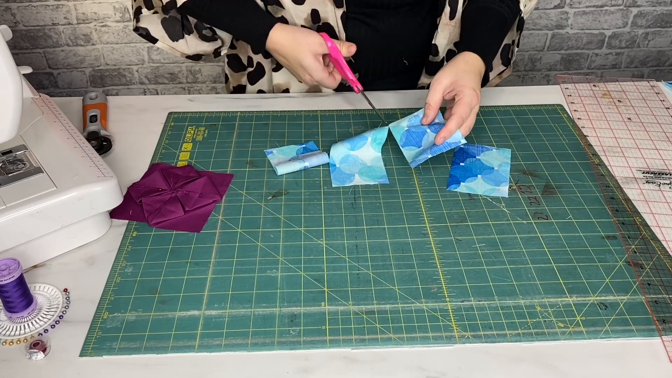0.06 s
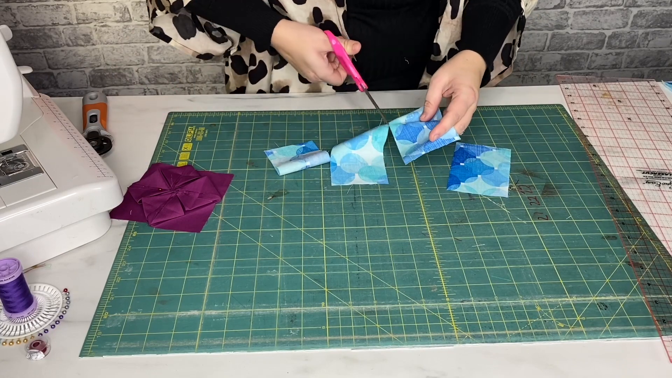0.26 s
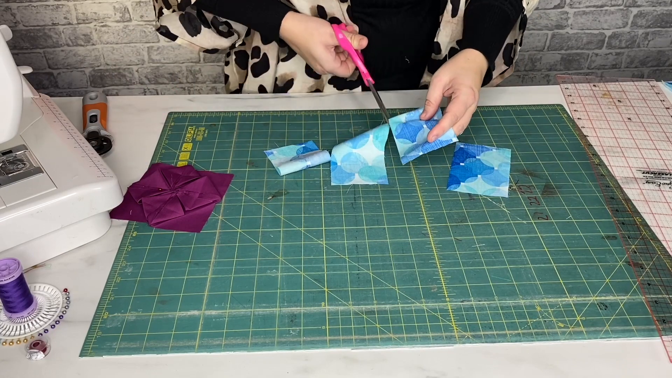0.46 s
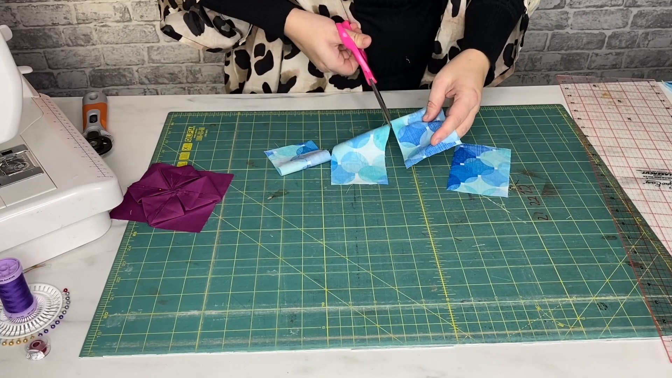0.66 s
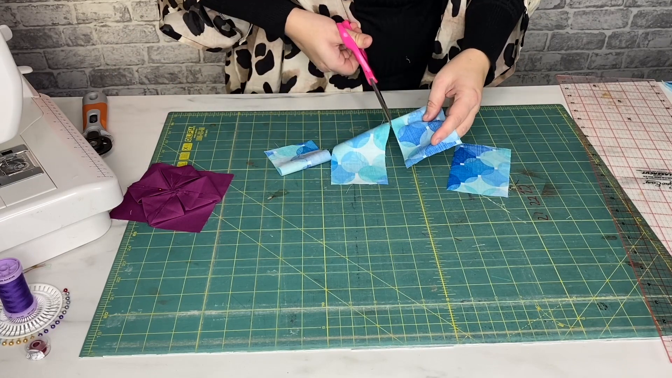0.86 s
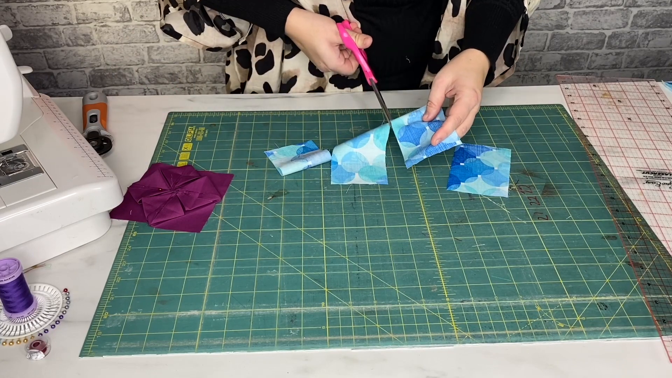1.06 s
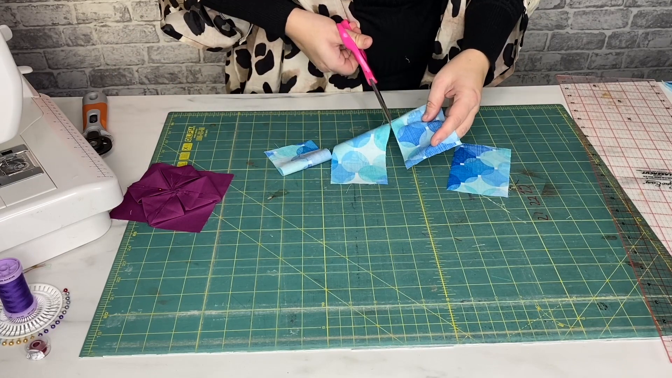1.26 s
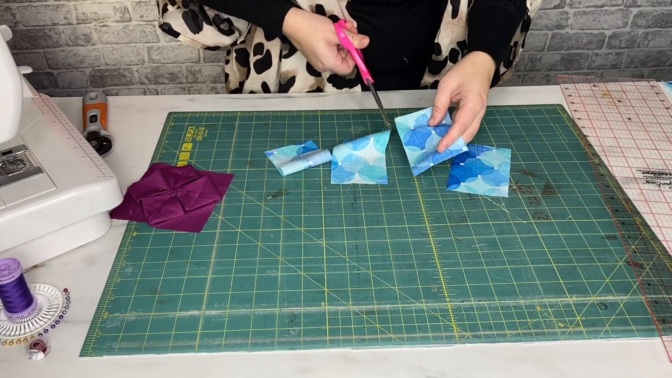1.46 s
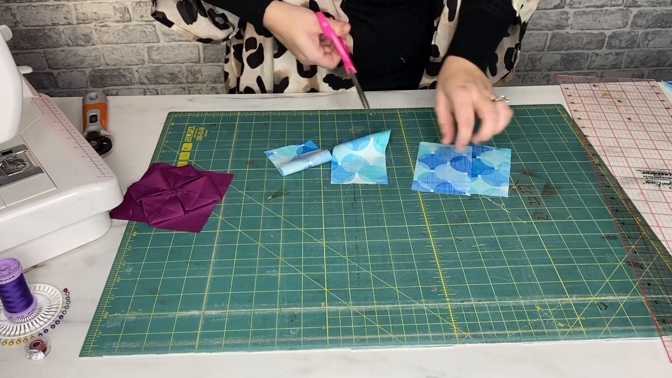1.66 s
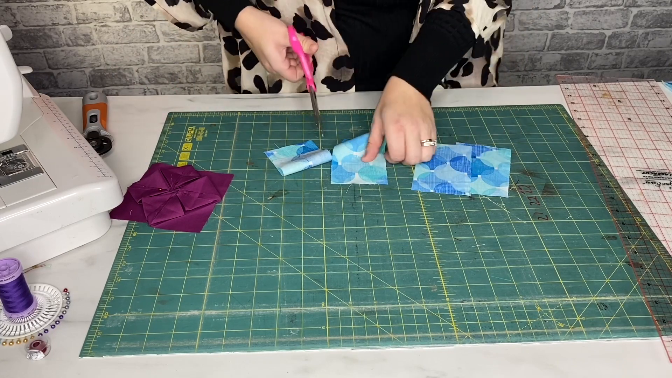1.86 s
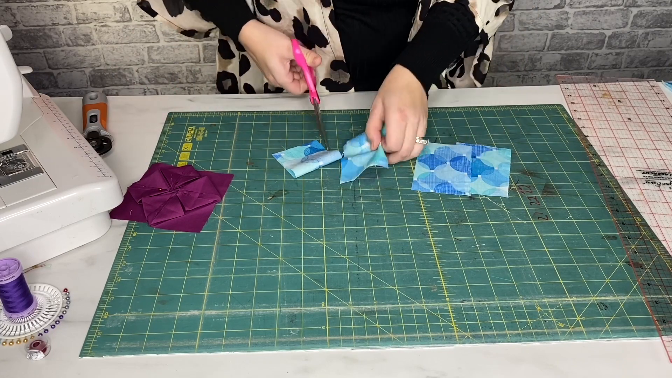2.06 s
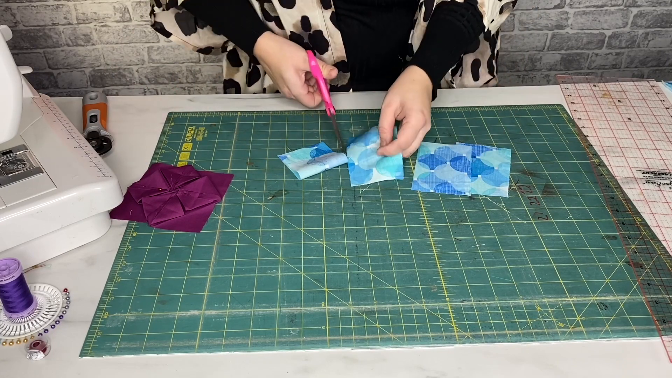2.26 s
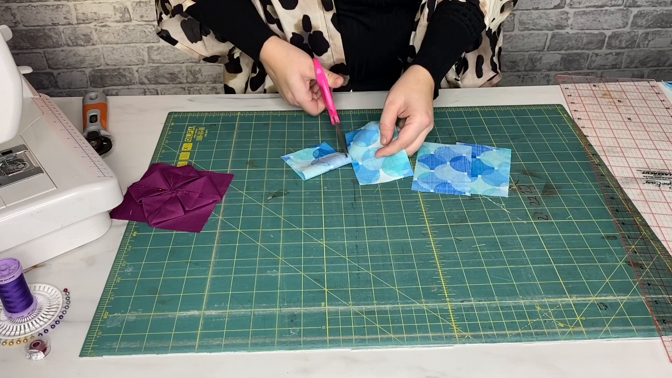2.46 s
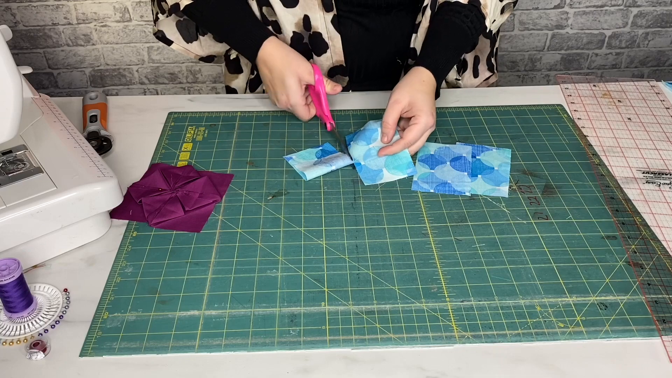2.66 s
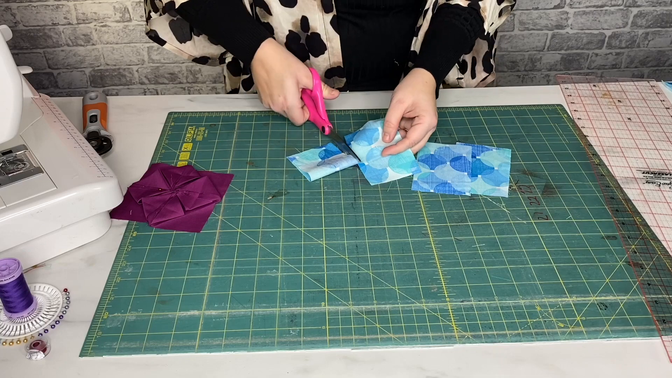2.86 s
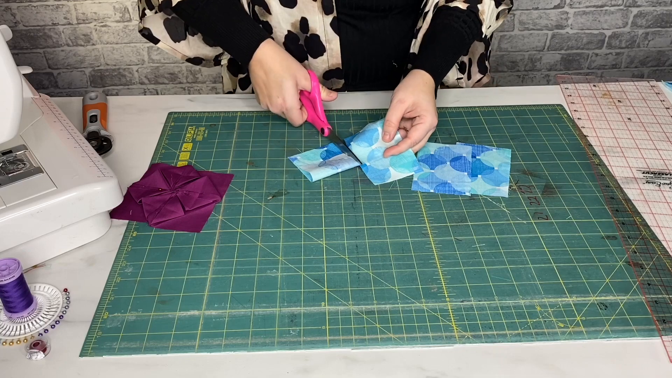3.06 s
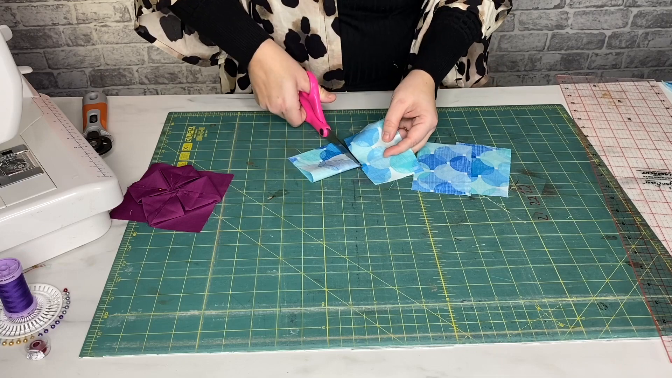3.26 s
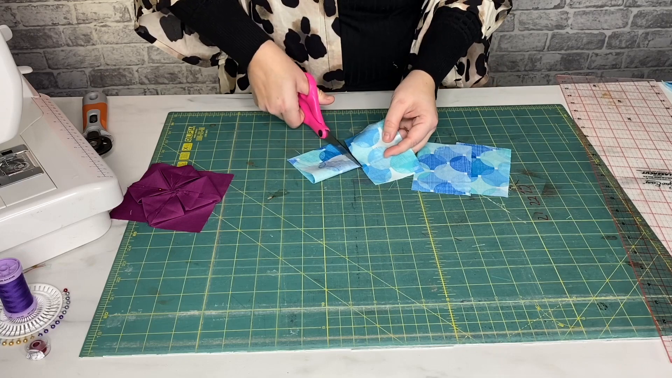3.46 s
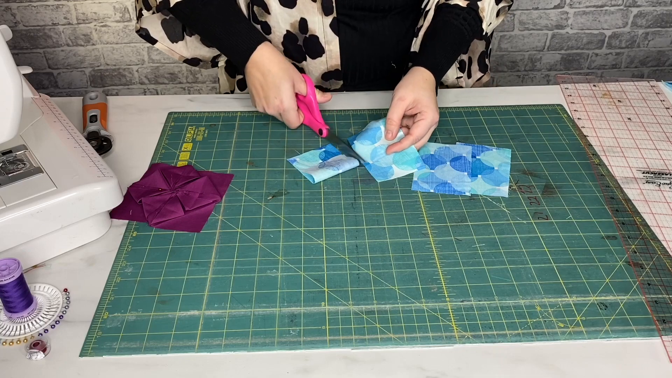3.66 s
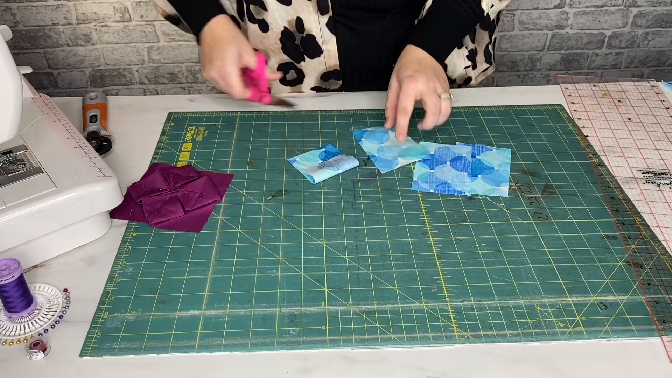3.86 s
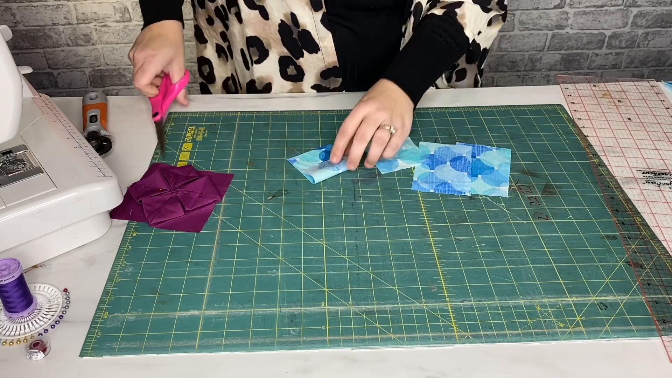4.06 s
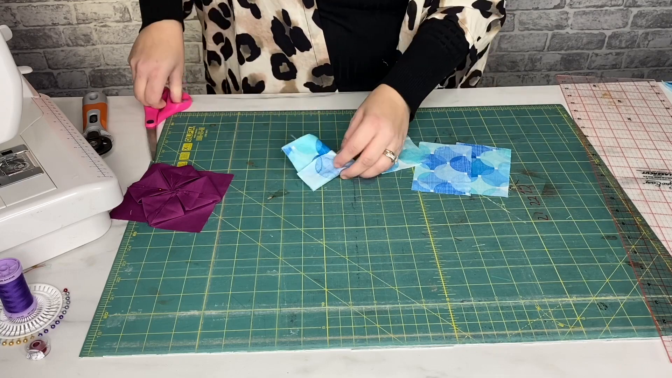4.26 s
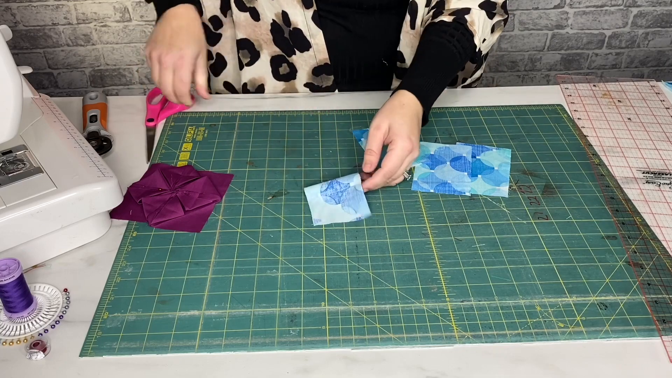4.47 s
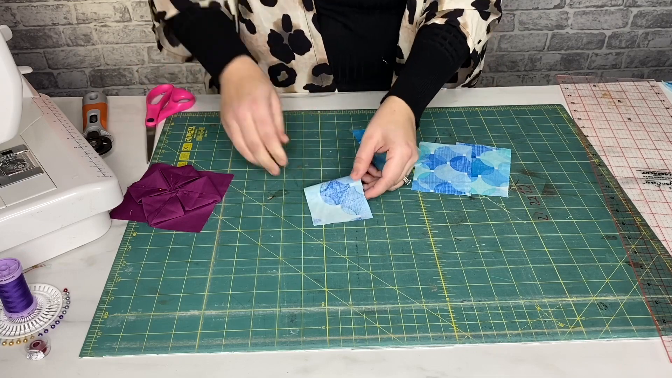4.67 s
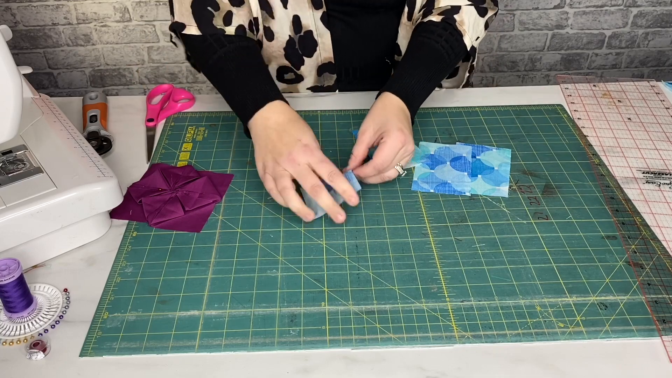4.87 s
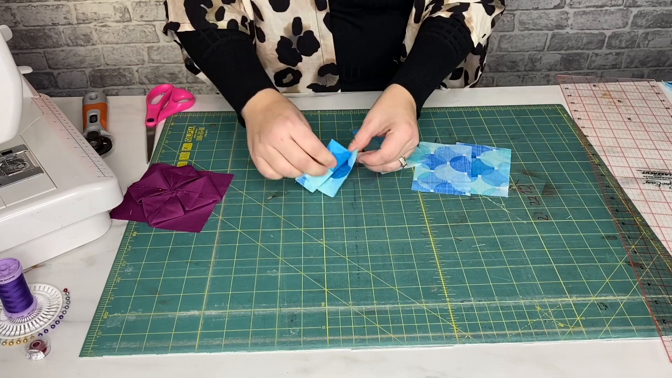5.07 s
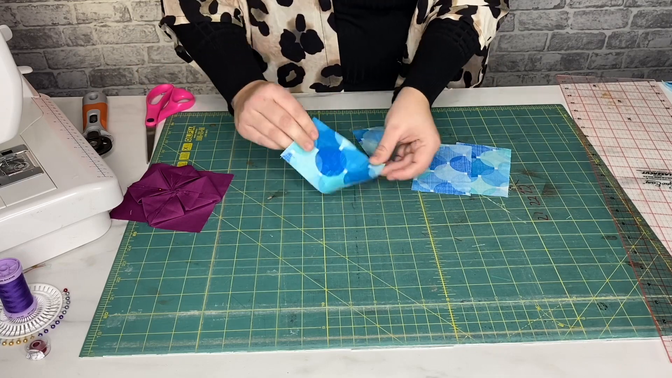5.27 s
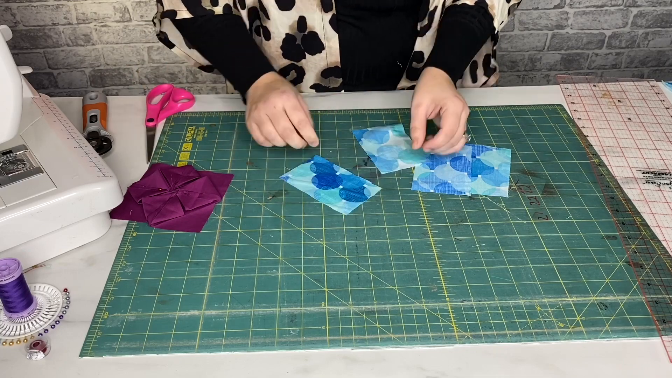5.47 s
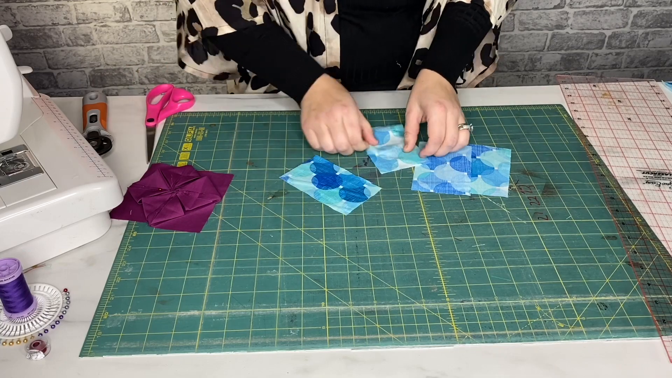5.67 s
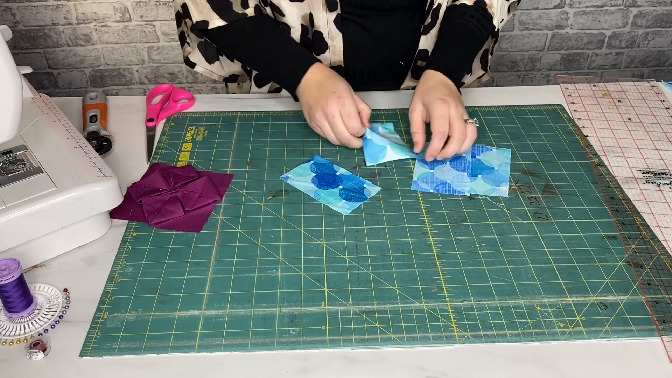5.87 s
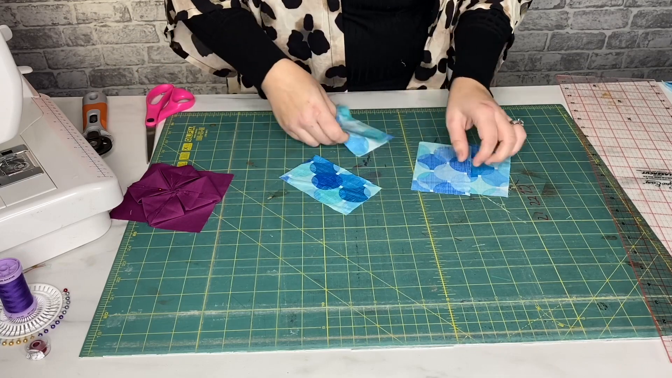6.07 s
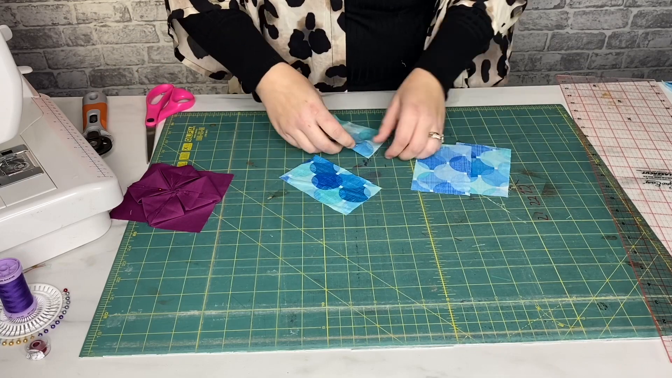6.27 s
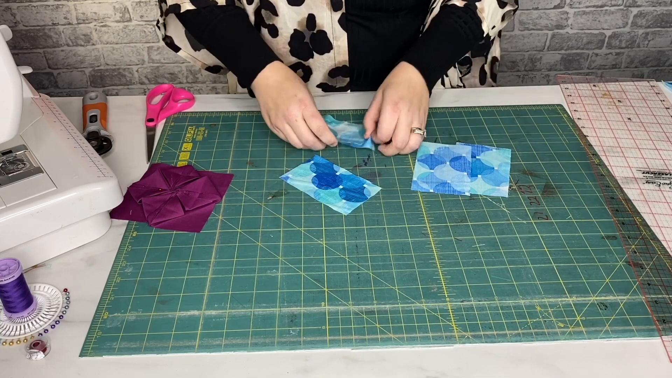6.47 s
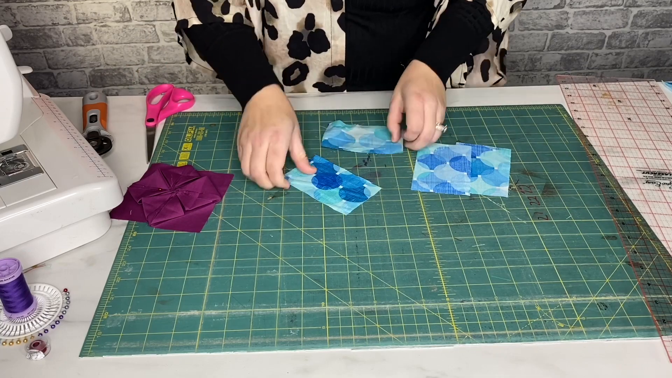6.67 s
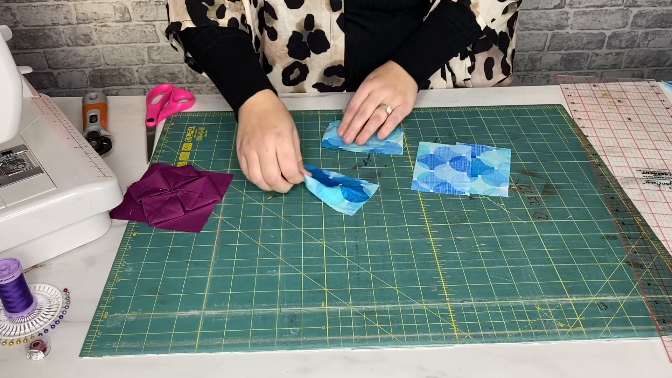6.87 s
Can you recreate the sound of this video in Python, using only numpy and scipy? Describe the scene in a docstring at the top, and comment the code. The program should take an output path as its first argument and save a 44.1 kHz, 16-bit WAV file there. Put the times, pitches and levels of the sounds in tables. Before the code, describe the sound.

Close stereo pickup of a work table indoors: one loud crisp scissor snip, soft cloth hiss and light scrapes, small knocks, then another sharp snip. Soon the steel scissors clatter down on the padded surface and rock to rest. Afterwards only gentle fabric rustles and faint pats remain, over quiet air and a low distant engine hum that swells and sags.

```python
"""A small, quiet room: scissors snip two threads between cotton squares over a cutting mat.
They also tap the table and are dropped on it: steel and wood sound as decaying modes set off by clicks.
Hands slide and rustle the cloth: enveloped noise shakes the table modes and hisses in bands.
Low sines make a far engine's drone and two other hums; banded noise makes the air and the room's echoes.
Two spaced microphones hear the table from its right side."""
import sys
import numpy as np
from scipy import signal
from scipy.io import wavfile

SR = 44100
rng = np.random.default_rng(int(sys.argv[2]) if len(sys.argv) > 2 else 0)


def generate_wav(sig):
    """Save sig (samples, or channels by samples) to the path in sys.argv[1] as 16-bit PCM at SR."""
    pcm = np.round(np.clip(np.atleast_2d(sig).T, -1, 1) * 32767).astype(np.int16)
    wavfile.write(sys.argv[1], SR, pcm)


def boost_factor(decibels):
    """Convert a level in decibels to a linear amplitude factor."""
    exponent = np.asarray(decibels, float) / 20
    return 10 ** exponent


N = 304618

# modes of the table and mat: (f/Hz, relative level/dB, free t60/s)
TABLE_MODES = [(139.8, -9.5, 0.14), (184.2, -7.5, 0.17), (241.8, -1, .1), (336, -5, 0.054),
               (425.5, -0.5, 0.1), (584, -4, 0.058), (606, -3, 0.035), (796, -3, 0.036), (873, -4.5, 0.014),
               (966, -2, 0.018), (1084, -10.5, .03), (1160, -2.5, 0.03), (1330, -8, 0.068),
               (1490, -3.5, 0.028), (1744, -13.5, 0.06), (1906.6, -9, 0.04), (2415, -9.5, 0.053),
               (2930, -9.5, 0.019)]


def rms_one(x):
    """Normalisation: scale to a root-mean-square of 1."""
    return x / np.sqrt(np.mean(x ** 2) + 1e-20)


def in_time(rows):
    """Linear interpolation: each column of a curve, one value per sample."""
    s, *columns = np.transpose(rows)
    return [np.interp(np.arange(N) / SR, s, column) for column in columns]


def at_hz(points, hz):
    """Logarithmic frequency scale: read a (frequency, value) table at hz."""
    table_hz, values = np.array(points).T
    return np.interp(np.log(hz), np.log(table_hz), values)


def drift(rate_hz):
    """Low-passed random fluctuation: noise through two equal poles at rate_hz, scaled to rms 1."""
    hop = 40    # samples between computed values
    r = np.exp(-2 * np.pi * rate_hz * hop / SR)
    noise = rng.standard_normal(N // hop + 2002)
    slow = signal.lfilter([1], [1, -2 * r, r * r], noise)[2000:]   # without the filter's start
    return np.interp(np.arange(N) / hop, np.arange(len(slow)), rms_one(slow))


def ring(clicks, hz, t60):
    """Damped resonance: a unit click starts a decaying sine of height 1."""
    r, w = boost_factor(-60 / (t60 * SR)), 2 * np.pi * hz / SR
    return signal.lfilter([0, np.sin(w)], [1, -2 * r * np.cos(w), r * r], clicks + 1e-18)


def bands(size):
    """Interchannel correlation: half-octave stereo noise, mid and side weighted for a set likeness."""
    # how alike left and right are: (f/Hz, correlation coefficient)
    likeness = [(25, 0.96), (60, 0.92), (250, 0.76), (600, 0.062), (1500, -0.052), (4000, 0.53),
                (12000, -0.44)]
    edges_hz = 22 * 2 ** np.arange(0, 9.7, .5)
    white = rng.standard_normal((2, 2, size))
    for k, (low, high) in enumerate(zip(edges_hz, edges_hz[1:])):
        band = signal.butter(2, [low, high], "band", fs=SR, output="sos")
        mid, side = signal.sosfilt(band, white[k % 2])   # neighbouring bands use separate noise
        hz = np.sqrt(low * high)
        alike = np.clip(at_hz(likeness, hz), -1, 1)
        yield hz, np.sqrt(1 + alike) * mid + np.sqrt(1 - alike) * side * [[1], [-1]]


def place(x, pan_db, lag_ms):
    """Interchannel level and time difference: left is pan_db stronger and lag_ms later than right."""
    left = np.roll(x, round(lag_ms * SR / 1000))
    return np.array([left * boost_factor(pan_db / 2), x * boost_factor(-pan_db / 2)])


def peak_at(x, s, db):
    """Superposition in time: lay a short sound down at s with the given peak."""
    out, at = np.zeros(N + len(x)), round(s * SR)
    out[at:at + len(x)] = boost_factor(db) * x / np.abs(x).max()
    return out[:N]


def rattle(ms, share, size):
    """Repeated impact: one sharp click, then a run of uneven ones dying with time constant ms."""
    decay = np.exp(-np.arange(size) * 1000 / SR / max(ms, .05))
    run = share * rng.standard_normal(size) ** 3 * decay
    run[0] = 1
    return run


def stroke(s, db, rise_s, hold_s, fall_db_per_s):
    """Exponential envelope: a sound swells 20 dB in rise_s, holds, then falls at a steady dB rate."""
    t = np.arange(N) / SR - s
    rise_db = 20 * t / max(rise_s, .001)   # the swell takes at least 1 ms
    fall_db = -fall_db_per_s * (t - hold_s)
    return boost_factor(db + np.minimum(0, np.minimum(rise_db, fall_db)))


def air():
    """Stationary broadband noise: shaped bands make the room's air, each wavering a little."""
    # spectrum of the room noise: (f/Hz, relative level/dB per Hz)
    air_spectrum = [(13, -37), (22, -1.5), (92, -7), (152, -16.5), (236, -17), (356, -30), (409, -26.5),
                    (792, -40), (1130, -40), (1410, -29.5), (1760, -43.5), (5930, -53), (8490, -60.5),
                    (10000, -56), (16000, -71)]
    waver_db, level_db = 0.51, -57.5
    noises = [boost_factor(at_hz(air_spectrum, hz) + waver_db * drift(0.71)) * noise for hz, noise in bands(N)]
    return boost_factor(level_db) * rms_one(sum(noises))


def tone(rows):
    """Phase integration: a sine follows a pitch and rms-level curve, silent outside its span."""
    hz, db = in_time(rows)
    t = np.arange(N) / SR
    fade = np.clip(np.minimum(t - rows[0][0], rows[-1][0] - t) / 0.06, 0, 1)
    return np.sqrt(2) * boost_factor(db) * fade * np.sin(2 * np.pi * np.cumsum(hz) / SR)


def engine_drone():
    """Amplitude modulation: a gliding low sine, its level wavering at random."""
    # pitch and mean level of the far engine: (t/s, f/Hz, level/dB)
    engine_curve = [(0.0, 93.2, -63), (0.5, 89.3, -56.5), (0.79, 88.95, -64), (1.04, 89.7, -49.5),
                    (1.13, 88.9, -57), (2.32, 89.54, -49), (2.63, 87.56, -64.5), (2.75, 88.6, -54),
                    (3.15, 88, -54.5), (3.44, 87.3, -45.5), (3.84, 86.8, -50.5), (4.61, 86.7, -44),
                    (4.84, 85.9, -53), (5.44, 85.3, -51), (6.15, 83.7, -59), (6.65, 84.5, -58),
                    (6.76, 75.9, -61), (6.9, 77.1, -65)]
    waver_db = 1.5
    return tone(engine_curve) * boost_factor(waver_db * drift(6.1))


def deep_hum():
    """Pure tone: a deeper, fainter hum on a nearly constant sine."""
    # pitch and level of the hum: (t/s, f/Hz, level/dB)
    hum_curve = [(0.0, 35.7, -65.5), (3.3, 35.7, -63), (3.8, 35.7, -60), (4.94, 35.8, -66.5),
                 (6.9, 36, -64)]
    return tone(hum_curve)


def low_swell():
    """Pure tone with a level contour: a short low sine swells and fades."""
    # pitch and level of the short tone: (t/s, f/Hz, level/dB)
    swell_curve = [(0.82, 112, -71), (0.93, 112, -59.5), (1.12, 114.9, -57), (1.27, 112, -68)]
    return tone(swell_curve)


def rubs():
    """Friction-driven resonance: dense slips on the mat shake the table, while cloth fibres hiss."""
    # skin and steel dragged on the mat; a rise of zero or below counts as 1 ms:
    # (full strength t/s, relative level/dB, 20 dB rise time/s, hold/s, loudest f/Hz)
    drag_rows = [(0.89, -72.5, -0.04, 0.095, 616), (1.07, -77, 0.1, .04, 700),
                 (1.816, -45, 0.04, 0.0019, 460), (1.902, -71.5, -0.14, 0.016, 920),
                 (2.083, -50.5, 0.02, .17, 414), (2.093, -51.5, 0, 0.18, 1400),
                 (2.373, -63.5, 0.75, 0.055, 428), (2.812, -69.5, 0.6, 0.38, 1098),
                 (3.25, -57, -0.01, 0.0016, 484), (3.73, -69, 1.1, 0.021, 400),
                 (4.2, -37, 0.1046, .01, 650), (4.268, -34.5, 0.07, .01, 900), (4.637, -71, 1.2, 0.13, 700),
                 (4.896, -75, 0.7, 0.2715, 1192), (5.429, -73, -0.33, 0.029, 2400),
                 (5.584, -66.5, -0.04, .08, 1202), (5.694, -58.5, 0.2, .03, 598.7),
                 (6.3, -57, 0.06, 0.077, 847), (6.684, -57.5, 0.04, 0.059, 1103)]
    # cloth folded, lifted and laid down, and a faint hiss leading into the first snip; same rule for the rise:
    # (full strength t/s, relative level/dB, 20 dB rise time/s, hold/s, added level above 8 kHz/dB)
    rustle_rows = [(1.185, -83, -0.7, 0.025, 12), (1.345, -86, -0.03, .02, 6),
                   (1.389, -62, -0.0861, .002, 4), (1.562, -67, -0.5, 0.034, 0),
                   (1.825, -71, -0.67, 0.046, 1), (1.9, -65.5, -0.07, 0.037, 3.5),
                   (2.096, -62.5, 0.04, .14, -5), (2.79, -78, -0.04, 0.0026, -7),
                   (3.109, -83, 0.2, .003, 5.5), (3.234, -75, -0.17, 0.002, -2.5),
                   (3.736, -67.5, -0.1, 0.0034, -1), (3.808, -64, -0.0954, 0.0021, 6.5),
                   (4.024, -82, -0.13, 0.063, 6), (4.19, -62, 0.0559, 0.0019, -21),
                   (4.279, -62, 0.15, .003, -6.5), (4.295, -60.5, 0.0356, .002, 5.5),
                   (4.719, -71.5, 0.08, 0.051, 2.5), (5.013, -90, 0.07, 0.13, 14.5),
                   (5.196, -91, -0.45, 0.032, 15.5), (5.424, -84.5, -0.7, 0.015, -3),
                   (5.575, -59.5, -0.11, 0.0029, 1.5), (5.644, -67.5, -0.04, 0.069, 5),
                   (5.869, -65, 0.05, 0.016, 4), (6.094, -74, 0.11, .17, -0.5),
                   (6.295, -57, -0.06, .003, -3), (6.35, -56, -0.0249, 0.0066, 2.5),
                   (6.426, -72.5, -0.02, 0.16, -1), (6.681, -56.5, 0.01, 0.041, 2)]
    # spectrum of the cloth: (f/Hz, relative level/dB per Hz)
    cloth_spectrum = [(410, -35), (700, -5), (746, -3), (977, -13.5), (1140, -6.5), (5880, -8.5),
                      (10200, -17), (12100, -37.5), (13400, -19), (15000, -21)]
    drag_fall, rustle_fall = 264, 301   # dB per s
    narrow_db = 6.5   # loss one octave off the loudest pitch
    shift_db = 2.6    # spread of the changing cloth colour

    drags = np.array([stroke(*row[:4], drag_fall) for row in drag_rows])
    drag_hz = np.array(drag_rows)[:, 4]
    slips = rng.standard_normal(N) * boost_factor(3.2 * drift(60))
    modes = [boost_factor(level_db) * ring(slips, hz, .7 * t60) * (-1) ** k   # rings shorter than the free table
             for k, (hz, level_db, t60) in enumerate(TABLE_MODES)]
    shaken = 0
    for mode, (hz, _, _) in zip(modes, TABLE_MODES):
        favour = boost_factor(-narrow_db * np.log2(hz / drag_hz) ** 2)
        shaken = shaken + mode * (favour @ drags)
    shaken = shaken / np.std(sum(modes)) * boost_factor(1.0)

    strokes = [stroke(*row[:4], rustle_fall) for row in rustle_rows]
    rustle = sum(strokes)
    sheen = sum(boost_factor(row[4]) * x for row, x in zip(rustle_rows, strokes))
    fibres = [(hz, boost_factor(at_hz(cloth_spectrum, hz) + shift_db * drift(3.5)) * noise)   # folds move
              for hz, noise in bands(N) if hz > 600]
    body = sum(x for hz, x in fibres if hz < 8000)
    top = sum(x for hz, x in fibres if hz > 8000)
    clumps = boost_factor(2.2 * drift(60) + 3.2 * drift(250))
    cloth = (rustle * body + sheen * top) * clumps / np.std(body + top)
    return place(shaken, -0.59, lag_ms=.05) + cloth * boost_factor(3.0)


def knocks():
    """Modal excitation: a blow favours modes near its pitch; hard edges add a tick, the board a boom."""
    # taps and drops on the table:
    # (t/s, relative level/dB, loudest f/Hz, tick level/dB and boom level/dB relative to the knock)
    blows = [(1.196, -79, 1360, 31.5, 8.5), (1.217, -87.5, 729, 28.5, 9), (1.805, -51.5, 820, 11, 3),
             (2.078, -47, 1450, -16, 4.5), (2.773, -56.5, 1330, -23.5, 3.5), (2.909, -64.5, 686, -6, -2),
             (3.105, -48, 1350, -18, -15), (3.118, -47, 1200, -30.5, -12), (3.239, -52.5, 1160, -22, -15.5),
             (3.248, -37.5, 1250, -39.5, -10.5), (3.387, -27, 1320, -12, -6.5), (3.43, -34, 1200, -3, 0),
             (3.542, -23, 1550, -4.5, -3.5), (4.083, -22.5, 1490, 0, -6), (4.177, -18.5, 913, -26.5, -7.5),
             (4.191, -29, 1330, -12.5, -19.5), (4.2794, -24, 1220, 0, -17),
             (4.285, -14.5, 1290, -31.5, -26), (4.294, -23.5, 980, -24.5, 0),
             (4.298, -25, 1050, -31.5, -18), (4.306, -20.5, 800, -33.5, -12.5), (4.45, -26, 900, -4, -8.5),
             (5.419, -67, 2400, -9.5, -8), (5.578, -50.5, 1480, -9.5, -7), (6.293, -52, 774, -6.5, -20.5),
             (6.68, -51, 1135, -6, -9)]
    # the dropped scissors rock to rest, each touch softer: (t/s, relative level/dB)
    rocks = [(4.581, -44.5), (4.729, -49), (4.88, -57), (5.01, -60), (5.118, -62), (5.22, -63)]
    # faint ring of jolted blades: (f/Hz, level/dB relative to the tick's peak, t60/s)
    loose_blades = [(4500, -36, .03), (5780, -33, .1)]
    rattle_ms = 1.6       # time constant of a contact's chatter
    focus_per_db = 0.58   # softer blows wake fewer modes: dB lost one octave off pitch per dB of level below 0
    rock_hz, rock_tick_db, rock_boom_db = 1350, -13, -3.5
    bright = signal.butter(1, [1900, 6500], "band", fs=SR, output="sos")

    out = 0
    touches = [(s, db, rock_hz, rock_tick_db, rock_boom_db) for s, db in rocks]
    for s, db, centre_hz, tick_db, boom_db in list(blows) + touches:
        hit = rattle(rattle_ms, 0.024, size=9000)
        knock, boom = 0, 0
        for k, (hz, level_db, t60) in enumerate(TABLE_MODES):
            sign = 1 if rng.random() < .75 else -1
            mode = sign * boost_factor(level_db + rng.normal(0, 1.4)) * ring(hit, hz, t60)
            if hz > 600:
                knock = knock + mode * boost_factor(focus_per_db * db * np.log2(hz / centre_hz) ** 2)
            else:
                boom = boom + mode * (-1) ** k
        soft = signal.butter(2, [.55 * centre_hz, 3.4 * centre_hz], "band", fs=SR, output="sos")
        knock = signal.sosfilt(soft, knock)   # a padded contact

        chatter = rattle(1.8 * rattle_ms, 0.59, size=9000)   # the loose blades chatter longer
        tick = signal.sosfilt(bright, chatter)
        jolted = sum(boost_factor(ring_db + rng.normal(0, 3.0)) * ring(hit, hz, t60)
                     for hz, ring_db, t60 in loose_blades)
        tick = tick + np.abs(tick).max() * jolted

        out = out + place(peak_at(knock, s, db + 1.5), 1.9, lag_ms=.09)
        out = out + place(peak_at(tick, s, db + tick_db + 4.0), 0.62, lag_ms=.24)
        # the board moves a little later
        out = out + place(peak_at(boom, s + .003, db + boom_db - 2.0), -0.58, lag_ms=.03)
    return out


def snips():
    """Dispersive modal ringing: the edges slam past each other, ring and echo off near surfaces."""
    # blades snap shut: (t/s, relative level/dB, left-right level/dB, brightness/dB per octave)
    closings = [(1.3937, -9.5, 5.5, -4), (3.5342, -7, 3, -2)]
    # modes of the blades: (f/Hz, relative level/dB, t60/s)
    blade_modes = [(1476, -21, 0.004), (2220, -17, 0.0049), (3000, -17.5, 0.0024), (3876, -12, 0.0017),
                   (4983, -5, 0.0031), (6210, -9.5, .003), (6945, -1.5, 0.0017), (8160, -1.5, 0.0014),
                   (9375, -6, .004), (9820, -6.5, .004), (10520, -1.5, 0.0097), (10850, -9, 0.0028),
                   (13850, -11.5, .003), (15500, -12, 0.0028)]
    # near surfaces: (delay/ms, level/dB relative to the direct sound)
    near_echoes = [(3.3, -15), (5.4, -17), (8.0, -21.5)]
    out = 0
    for s, db, pan_db, tilt_db in closings:
        rings = 0
        for k, (hz, level_db, t60) in enumerate(blade_modes):
            hit = np.zeros(3000)
            late_s = .35e-3 * np.log2(SR / 2 / hz)   # bending waves: high pitches arrive first
            hit[round(late_s * SR)] = (-1) ** k
            mode_db = level_db + tilt_db * np.log2(hz / 5000) + rng.normal(0, 1.0)
            rings = rings + boost_factor(mode_db) * ring(hit, hz, t60)
        echoes = sum(boost_factor(echo_db) * np.roll(rings, round(ms * SR / 1000)) for ms, echo_db in near_echoes)
        out = out + place(peak_at(rings + echoes, s + .0006, db + 4.5), pan_db, lag_ms=.25)
    return out


def room(x):
    """Reverberation as convolution: echoes set in at 3 to 4 ms as noise that dies band by band."""
    # reverberation time of the room: (f/Hz, t60/s)
    room_t60 = [(150, 0.55), (400, 0.38), (1040, 0.35), (2760, 0.4), (7280, 0.27)]
    size = SR // 2
    t = np.arange(size) / SR
    tail = sum(noise * boost_factor(-60 * t / at_hz(room_t60, hz)) for hz, noise in bands(size) if hz > 100)
    tail = tail * np.clip((t - .003) / 0.001, 0, 1)
    return signal.fftconvolve(x[None], rms_one(tail) / np.sqrt(size), axes=1)[:, :N]


def scene():
    """Superposition: near sources with their room, over the hums and the air."""
    hands, hits, cut = rubs(), knocks(), snips()
    # the right channel of each source feeds the room
    wet = room(boost_factor(-5.5) * cut[1] + boost_factor(-5.0) * hits[1] + boost_factor(-8.0) * hands[1])
    low = (engine_drone() + low_swell() + deep_hum()) * boost_factor([[-.9], [.9]])   # stronger on the right
    return cut + hits + hands + wet + low + air()


def low_pass(x):
    """Removes everything above the highest recorded frequency."""
    return signal.sosfilt(signal.butter(12, 16810, fs=SR, output="sos"), x)


def record(dry):
    """Band limitation: the microphones drop the deepest bass and the top."""
    bass_cut = signal.butter(6, 30, "high", fs=SR, output="sos")
    top_cut = signal.cheby2(10, 60, 16800, fs=SR, output="sos")
    mix = signal.sosfilt(top_cut, signal.sosfilt(bass_cut, dry))
    return low_pass(mix)


dry = scene()
out = record(dry)
generate_wav(out)
```